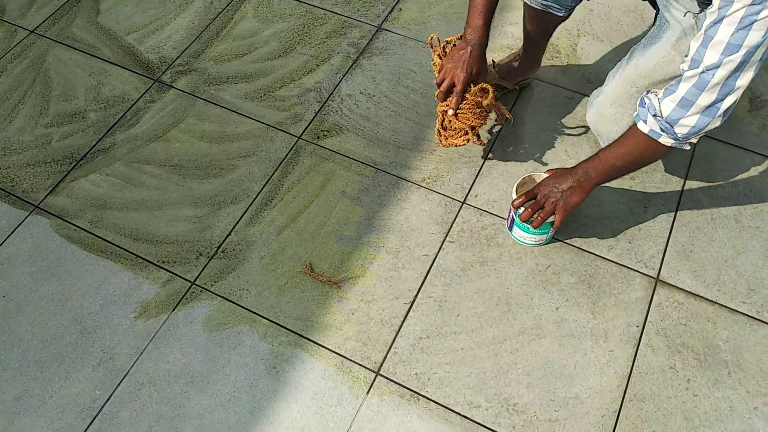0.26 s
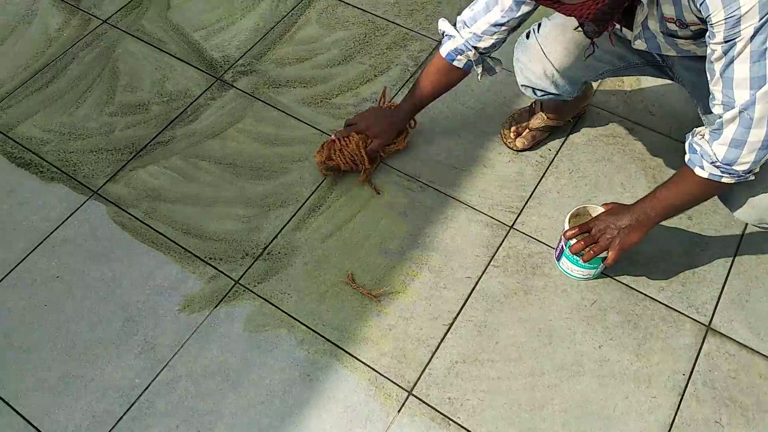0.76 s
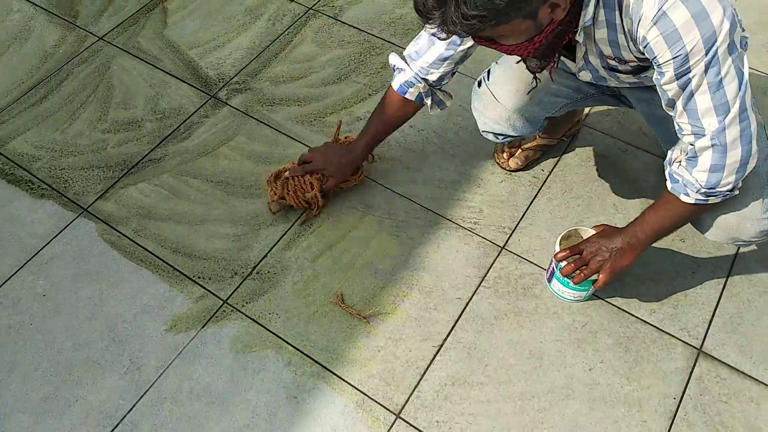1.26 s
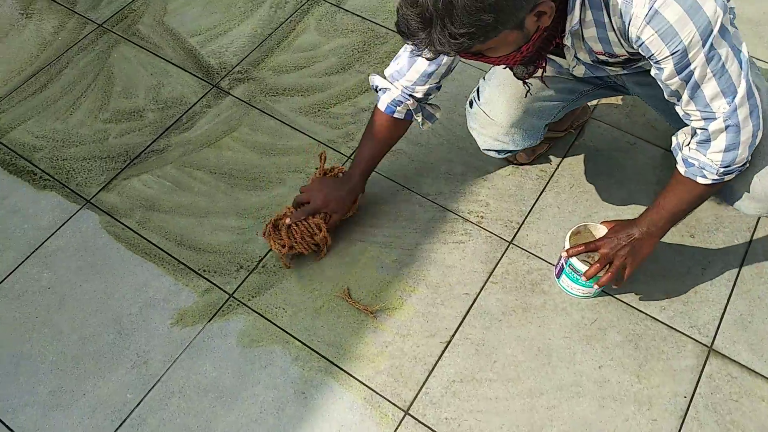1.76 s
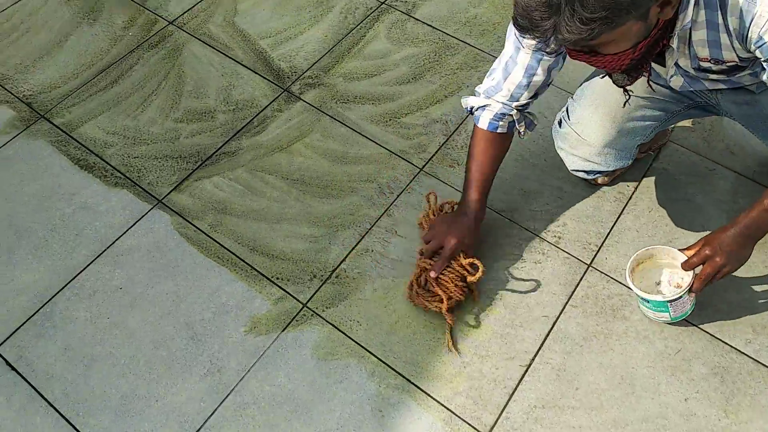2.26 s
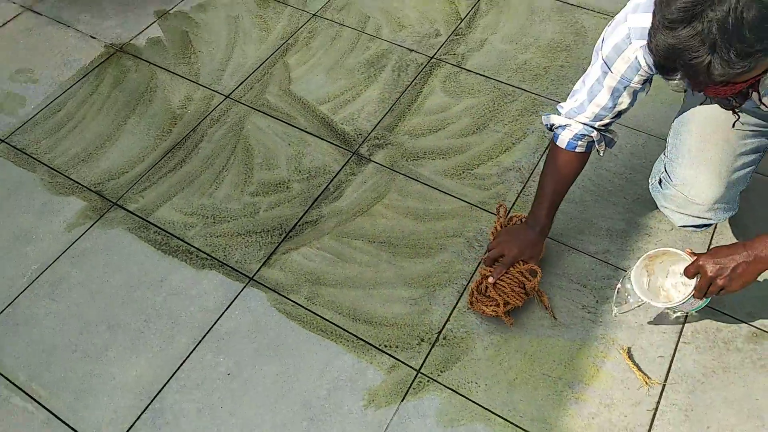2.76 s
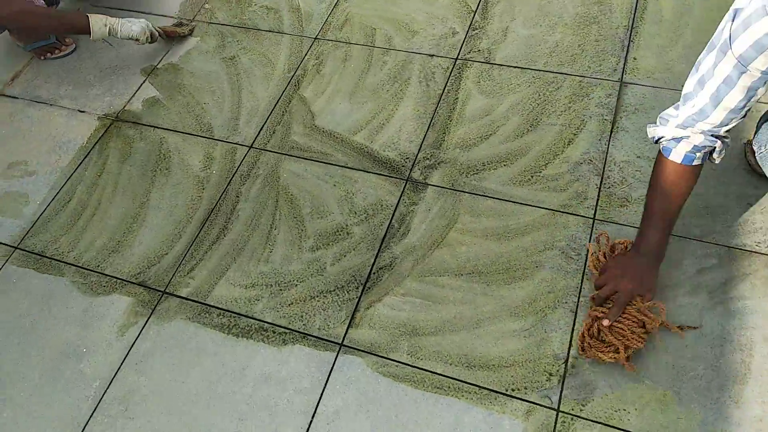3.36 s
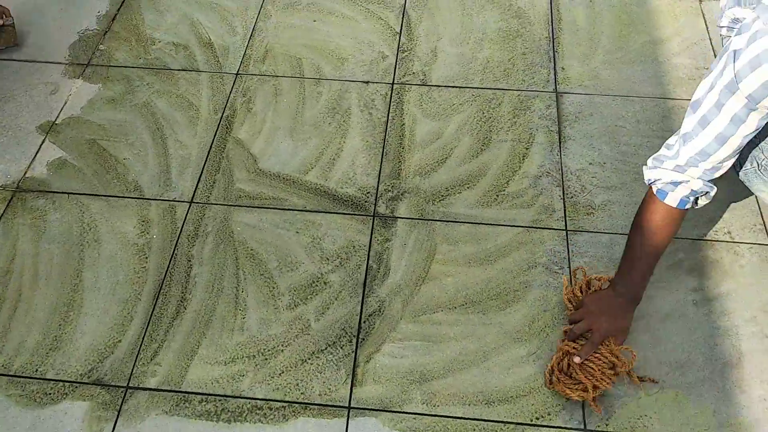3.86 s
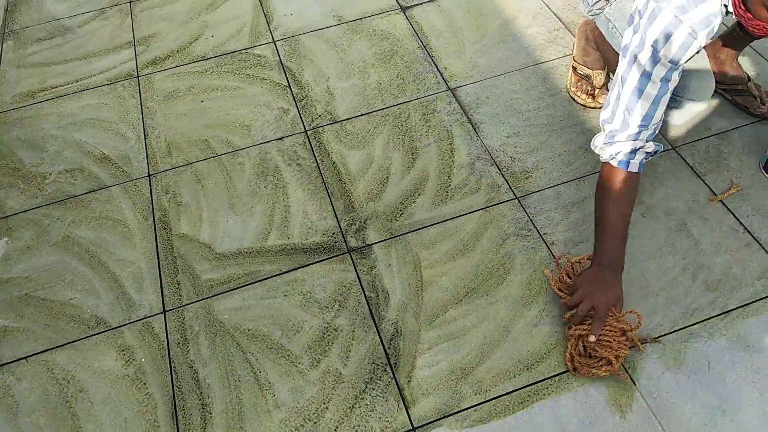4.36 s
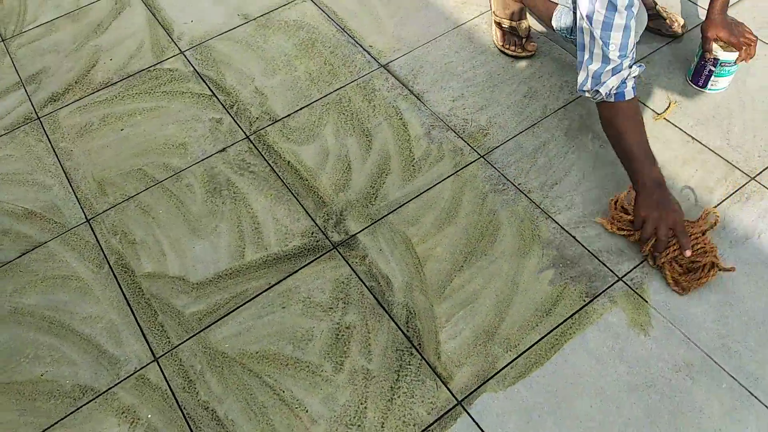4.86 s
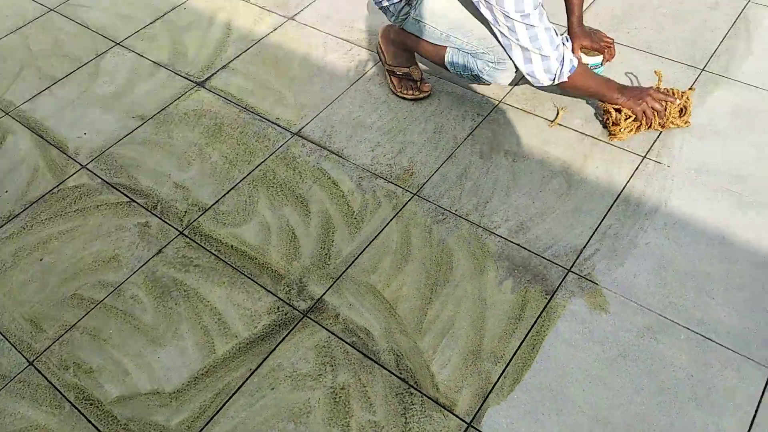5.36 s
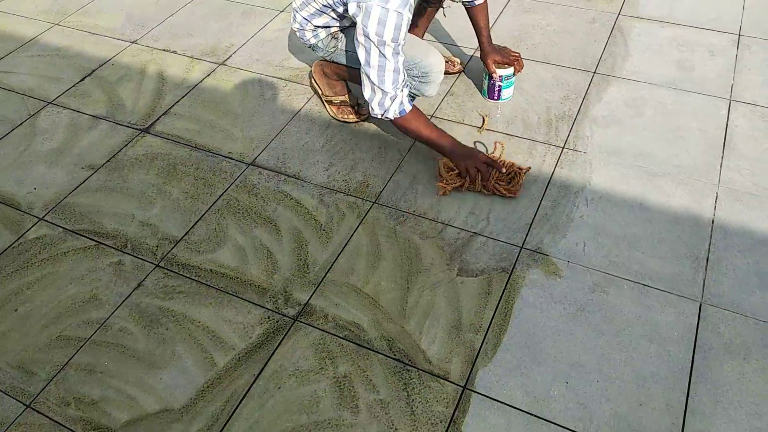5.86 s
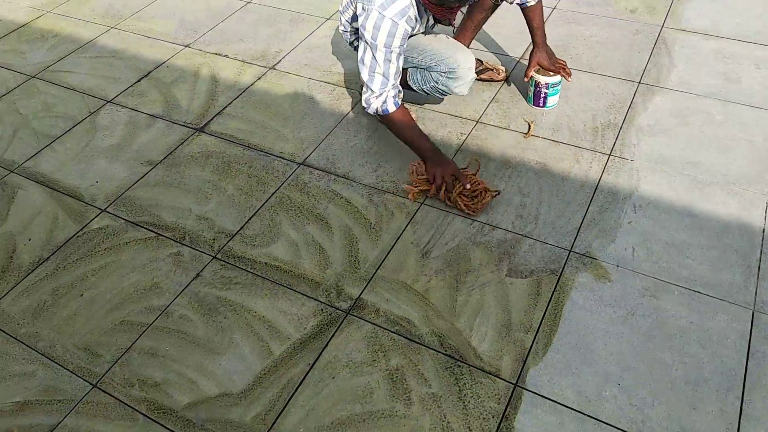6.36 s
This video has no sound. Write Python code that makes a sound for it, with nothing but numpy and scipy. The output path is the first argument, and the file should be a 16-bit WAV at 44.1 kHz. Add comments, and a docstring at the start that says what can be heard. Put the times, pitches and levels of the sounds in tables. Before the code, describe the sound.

Quick, hissing scrubbing strokes of rope fibre on a wet, gritty tile floor outdoors, with low wind buffets and faint scuffs.

```python
"""A bundle of rope fibre scrubs to and fro over wet floor tiles, outdoors, about four strokes a second.
Countless fibres catch and slip on the glaze: a bright hiss that dips at each turn of the hand,
over a lower rasp of grit. Sandals and a small tub scuff the floor now and then.
The hand-held stereo microphone follows the work; gusts buffet its two ports, with faint air far off."""
import sys
import numpy as np
from scipy import signal
from scipy.fft import rfft, irfft
from scipy.io import wavfile
from scipy.ndimage import uniform_filter1d, map_coordinates

SR = 44100
rng = np.random.default_rng(int(sys.argv[2]) if len(sys.argv) > 2 else 0)


def master_out(mix):
    """Clip the mix to full scale and print it as 16-bit PCM to the path in sys.argv[1]."""
    frames = np.transpose(np.atleast_2d(mix))
    ceiling = np.clip(frames, -1, 1)
    pcm = np.round(ceiling * 32767).astype(np.int16)
    wavfile.write(sys.argv[1], SR, pcm)


N = 290697
TIME = np.arange(N) / SR
FREQS = np.maximum(np.arange(N // 2 + 1) * SR / N, 1)
TOP_HZ = 15800  # highest frequency heard


def undb(db):
    """Decibels to gain."""
    return 10 ** (np.asarray(db) / 20)


def unit(x):
    """Scale to an rms of one."""
    return x / np.sqrt(np.mean(x ** 2, axis=-1, keepdims=True))


def curve(rows, column=1):
    """One column of a table, joined by straight lines in time."""
    rows = np.array(rows, float)
    return np.interp(TIME, rows[:, 0], rows[:, column])


def spectrum(rows, column=1):
    """Gain at each frequency from a table of freq_hz and level_db."""
    rows = np.array(rows, float)
    return undb(np.interp(np.log(FREQS), np.log(rows[:, 0]), rows[:, column]))


def shaped(x, gain):
    """Filter by a gain for each frequency."""
    return irfft(rfft(x) * gain, N)


def resonance(hz, width_hz):
    """Response of one damped resonance."""
    return 1 / (1 + 1j * (FREQS ** 2 - hz ** 2) / (FREQS * width_hz))


def walk(per_s):
    """Smooth random drift with an rms of one, changing about per_s times a second."""
    steps = rng.standard_normal(8192)
    joined = np.interp(TIME * per_s, np.arange(len(steps)), steps)
    return unit(uniform_filter1d(joined, int(SR / per_s / 2) + 1))


def slips(per_s, spread_db):
    """Tiny clicks at random moments, their sizes scattered by spread_db."""
    hit = rng.random(N) < per_s / SR
    polarity = rng.choice([-1, 1], N)
    return unit(hit * polarity * undb(spread_db * np.clip(rng.standard_normal(N), -3, 3)))


# Strokes across the tiles, each lasting until the next: start_s, sweep_db, opening_turn_re_sweep_db
STROKES = [(0.0, -60, 19.5), (0.084, -60, 11), (0.337, -56.5, 5), (0.55, -38, -4), (0.874, -37.5, -13),
           (1.095, -34.5, -10), (1.346, -38.5, -6), (1.566, -37.5, -4.5), (1.808, -38, -13.5),
           (2.05, -38.5, -4), (2.255, -39.5, -12.5), (2.475, -45.5, -5), (2.816, -61, 3),
           (3.043, -37.5, -32.5), (3.302, -35, -19), (3.543, -34, -14.5), (3.754, -37.5, -20),
           (4.005, -36, -8), (4.248, -35.5, -21), (4.525, -35.5, -20.5), (4.825, -37, -12),
           (5.094, -34, -13), (5.437, -39, -8.5), (5.795, -44.5, 8), (6.056, -40, 0), (6.334, -41, -1)]
# State of the floor and the grip: time_s, rasp_re_hiss_db, coarse_re_fine_db
GRIP = [(0, -24, -4), (0.47, -22, -5), (0.7, -28, 2), (1.0, -24, 1), (1.6, -28, 0), (2.4, -20, -1),
        (2.75, -15, -0.5), (3.4, -21, 1), (4.6, -14.5, 0), (5.3, -13, -1), (5.55, -17, -0.5),
        (6.59, -9, 1.5)]
# Early strokes swell to mid-sweep, later ones press more evenly: time_s, swell_db
SWELL = [(2.4, 8.5), (3.2, 2.5)]


def hand():
    """Gains of hiss, rasp and coarse strands as the hand speeds up, sweeps and slows into a turn."""
    rise_s, fall_share, speed_power = 0.08, 0.3, 1.8
    pile_up_db = 14.5  # grit gathers ahead of the bundle along a stroke
    start, sweep_db, turn_db = np.transpose(STROKES)
    stroke, along = stroke_progress()
    rise = np.clip((TIME - start[stroke]) / rise_s, 0, 1)
    fall = np.clip((1 - along) / fall_share, 0, 1)
    speed = np.sin(rise * np.pi / 2) * np.sin(fall * np.pi / 2)
    swell_db = curve(SWELL) * (np.sin(np.pi * along) - np.pi / 4)
    sweep = undb(sweep_db[stroke] + swell_db) * speed ** speed_power
    drag = np.interp(TIME, start, undb(sweep_db + turn_db))  # some strands still rub in the turn
    rasp_db = curve(GRIP) + pile_up_db * (along - .5)
    return drag + sweep, drag * undb(-15) + sweep * undb(rasp_db), undb(curve(GRIP, column=2) / 2)


def stroke_progress():
    """Number of the stroke under way, and how far along it the hand is, 0-1."""
    start = np.array(STROKES)[:, 0]
    stroke = np.maximum(np.searchsorted(start, TIME, "right") - 1, 0)
    return stroke, (TIME - start[stroke]) / np.diff(start, append=N / SR)[stroke]


# Colour of the hiss in front of the microphone, and off to one side: freq_hz, left_db, right_db
HISS_ON_AXIS = [(300, -34.0, -34.0), (1000, -27.0, -27.0), (2000, -25, -21), (2800, -14.5, -20),
                (3400, -8.7, -8.5), (4300, -0.5, 0.7), (5300, -15, -3.5), (6200, -6.8, 2.6),
                (7500, -6.8, -8.5), (9300, 2.4, 3.4), (10300, -1.2, -3.4), (11400, -8.8, -14.5),
                (13000, -12.6, -12.6), (15500, -12, -10.5)]
HISS_OFF_AXIS = [(300, -34.0, -34.0), (1000, -27.0, -27.0), (2000, -18, -14.5), (3000, -11.5, -17),
                 (3500, -5, -3.2), (4200, 0, 0), (5100, -7.5, -10.5), (6000, -11.5, -1.5), (7500, -5, 1.6),
                 (9000, -1, -1.7), (10300, 1.3, -5.6), (11500, -0.8, -8.8), (13000, -10, -12.5),
                 (15500, -11.7, -12)]


def fibre_hiss(shared_slips, snaps, coarse_gain, off_axis, port):
    """Fibres catch and slip on the glaze; the grip shifts the load from coarse strands to fine ends."""
    alike = 0.32 / (1 + (FREQS / 5000) ** 6) + 0.012  # the ports agree only on long waves
    own_slips = slips(per_s=14000, spread_db=1.5) + snaps
    fibres = shaped(shared_slips, np.sqrt(alike)) + shaped(own_slips, np.sqrt(1 - alike))
    coarse_band = 1 / (1 + (FREQS / 6500) ** 6)
    fibres = shaped(fibres, coarse_band) * coarse_gain + shaped(fibres, 1 - coarse_band) / coarse_gain
    ahead = unit(shaped(fibres, spectrum(HISS_ON_AXIS, column=port + 1)))
    aside = unit(shaped(fibres, spectrum(HISS_OFF_AXIS, column=port + 1)))
    return (1 - off_axis) * ahead + off_axis * aside


# Resonances of the pressed bundle at mid-stroke: pitch_hz, width_hz, level_db
BUNDLE_MODES = [(1510, 170, -19), (2516, 3300, 0)]


def grit_rasp(shared_grit):
    """Grit rolls under the bundle, whose resonances rise as it packs tighter along a stroke."""
    glide_octaves = 0.14  # either side of mid-stroke
    body = sum(undb(db) * np.abs(resonance(hz, width)) ** 2 for hz, width, db in BUNDLE_MODES)
    rasp = unit(shaped(shared_grit + slips(per_s=2600, spread_db=4.5), body))
    _, along = stroke_progress()
    pitch_ratio = 2 ** (glide_octaves * (2 * along - 1))
    return map_coordinates(rasp, [np.cumsum(pitch_ratio)], order=3, mode="wrap")


# The hand bears down and one group of strands bites: centre_s, half_length_s, boost_db, centre_hz
BITES = [(0.694, 0.19, 7, 4600), (0.966, 0.04, 4.5, 9700), (1.028, 0.03, 6.5, 4500),
         (1.155, 0.03, 5.5, 4560), (1.698, 0.085, 5, 7200), (5.513, 0.077, 7, 8500),
         (4.927, 0.043, 3, 11500)]


def strand_colour(rub):
    """Strands lie anew in each stroke and bite when pressed; the arm reflects their sound."""
    lie_depth_db, lie_spacing_hz = 2.2, 330
    patch_depth_db, patch_hz, patch_changes_per_s = 5, 170, 22
    comb_depth_db, arm_lag_ms, arm_swing_ms = 2.3, 0.4, 0.09
    bite_half_octaves = 0.65
    hz, times, frames = signal.stft(rub, SR, nperseg=512)
    starts = np.array(STROKES)[:, 0]
    stroke = np.maximum(np.searchsorted(starts, times) - 1, 0)
    ripples = rng.standard_normal((len(starts), 200))
    lies = np.array([np.interp(hz / lie_spacing_hz, np.arange(200), row) for row in ripples])
    lie_db = lie_depth_db * np.tanh(uniform_filter1d(lies[stroke].T, size=12, axis=1))
    # random short-lived patches flicker across the spectrum
    grid = np.meshgrid(hz / patch_hz, times * patch_changes_per_s, indexing="ij")
    patch_db = patch_depth_db * map_coordinates(rng.standard_normal((128, 256)), grid, order=1, mode="wrap")
    reach = np.cos(np.pi * np.interp(times, starts, np.arange(len(starts))))
    lag_s = (arm_lag_ms + arm_swing_ms * reach) / 1000
    comb_db = comb_depth_db * np.cos(2 * np.pi * np.outer(hz, lag_s))
    colour = undb(lie_db + patch_db + comb_db)
    colour /= np.sqrt(np.mean(colour ** 2, axis=0))
    for centre_s, half_s, db, centre_hz in BITES:
        octaves = np.log2((hz[:, None] + 1) / centre_hz)
        colour *= undb(db * np.exp(-((times - centre_s) / half_s) ** 2 - (octaves / bite_half_octaves) ** 2))
    return signal.istft(frames * colour, SR)[1][:N]


# The microphone swings round to follow the work: time_s, off_axis_share, left_lead_ms
MIC_BEARING = [(0, 0.33, 0.13), (2.4, 0.43, 0.0067), (3.2, 0.9, 0.34), (5.2, 0.95, 0.18),
               (6.3, 0.95, 0.0086)]


def scrubbing():
    """Hiss and rasp reach the two ports slightly apart, fluttering as the fibres slip in tufts."""
    hiss_gain, rasp_gain, coarse_gain = hand()
    off_axis, lead_s = curve(MIC_BEARING), curve(MIC_BEARING, column=2) / 1000
    tufts = undb(.5 * walk(70) + .8 * walk(380))
    snaps = undb(-18) * slips(per_s=130, spread_db=4)  # wet strands snap off the tile
    fibres = slips(per_s=5200, spread_db=2) + snaps
    grit = slips(per_s=1000, spread_db=0)
    ports = []
    for port in range(2):
        heard_at = TIME + lead_s * (.5 - port)
        hiss = fibre_hiss(np.interp(heard_at, TIME, fibres), snaps, coarse_gain, off_axis, port)
        rasp = grit_rasp(np.interp(heard_at, TIME, grit))
        nearness = undb(0.33 + 1.45 * (port - .5))  # the work lies a little to the right
        rub = tufts * (nearness * hiss_gain * hiss + undb(-1) * rasp_gain * rasp)
        ports.append(strand_colour(rub))
    return np.array(ports)


# Rumble of a moderate gust on the microphone: freq_hz, level_db
RUMBLE = [(20, -27), (40, -19), (70, 1.5), (120, 3.5), (200, -6), (300, -15), (450, -26), (700, -47.5),
          (1100, -60.5), (3000, -56)]


def eddies(gust_db):
    """Eddies tumble over one port; a harder gust sheds faster ones and so reaches higher."""
    level_db = gust_db + 4.6 * np.tanh(1.5 * walk(42))
    speed = 2 ** (np.clip(level_db + 26, -6, 11) / 18)
    field = shaped(rng.standard_normal(N), spectrum(RUMBLE))
    small = shaped(field, 1 / (1 + (260 / FREQS) ** 4))
    large = field - small
    flurries = undb(8 * np.tanh(walk(90)) - 1)
    pressure = map_coordinates(large + small * flurries, [np.cumsum(speed)], order=3, mode="wrap")
    steady_s = 0.17  # slower swells are evened out, leaving the level to the gust
    power = uniform_filter1d(pressure ** 2, int(steady_s * SR))
    power = uniform_filter1d(power, int(steady_s * SR / 2))
    return pressure / np.sqrt(power) * undb(level_db + 2)


# Running breeze on the left and right ports: time_s, level_db
BREEZE_LEFT = [(0.0, -53.5), (0.74, -54.5), (1.0, -28), (1.1, -35), (1.22, -56.5), (1.54, -30), (2.02, -39),
               (2.1, -17), (2.44, -18), (2.7, -30), (2.77, -24), (2.93, -26.5), (3.02, -17.5), (3.17, -19),
               (3.25, -24.5), (3.54, -36.5), (3.78, -22), (3.94, -34), (4.04, -80), (5.14, -86),
               (5.4, -63.5), (6.58, -42.5)]
BREEZE_RIGHT = [(0.0, -32), (0.468, -56), (0.567, -23), (0.689, -21), (0.951, -32), (1.21, -25),
                (1.3, -45.5), (1.602, -32), (1.838, -41), (1.981, -20), (2.979, -31), (3.059, -24),
                (3.661, -51), (3.742, -25), (4.04, -73.5), (4.861, -87), (5.018, -57), (6.378, -53.5),
                (6.581, -52)]
# Lone puffs on the microphone: start_s, length_s, level_db, port (0 left, 1 right)
PUFFS = [(0.753, 0.079, -17.5, 1), (2.379, 0.11, -12.5, 0), (3.485, 0.068, -32.5, 1), (4.19, 0.2, -43, 0),
         (4.378, 0.18, -31, 0), (4.603, 0.095, -31.5, 0), (4.928, 0.053, -41, 0), (5.311, 0.17, -43.5, 0),
         (5.775, 0.17, -37, 0), (5.965, 0.071, -30.5, 0), (6.114, 0.16, -36, 0)]


def wind():
    """Each port catches its own breeze, and lone puffs that rise, hold and drop."""
    edge_s = 0.028
    strength = undb([curve(BREEZE_LEFT), curve(BREEZE_RIGHT)])
    for start, length, db, port in PUFFS:
        edge = np.clip(np.minimum(TIME - start, start + length - TIME) / edge_s, 0, 1)
        strength[port] = np.hypot(strength[port], undb(db) * np.sin(edge * np.pi / 2) ** 2)
    return np.array([eddies(gust_db) for gust_db in 20 * np.log10(strength)])


# Outdoor air in the distance: freq_hz, level_db
DISTANT_AIR = [(200, -31), (450, 11.5), (1100, 10), (2500, 13), (6000, -40)]


def air():
    """Faint, steady outdoor background, different at each port."""
    return undb(-61) * unit(shaped(rng.standard_normal((2, N)), spectrum(DISTANT_AIR)))


# Single eddies right on the microphone: start_s, level_db, swirl_hz, port (0 left, 1 right)
BUFFETS = [(0.045, -13, 238, 1), (0.55, -5, 151, 1), (0.615, -10.5, 264, 1), (0.738, -13, 191, 1),
           (0.819, -6, 254, 1), (1.025, -21.5, 326, 1), (1.109, -14, 170, 1), (1.547, -22, 183, 0),
           (1.735, -13, 115.3, 0), (1.984, -8, 270, 1), (2.231, -1.5, 326, 0), (2.266, -6, 289, 0),
           (2.404, -5, 348, 0), (2.438, -8, 384, 0), (2.48, -4, 398, 0), (3.022, -7.5, 272, 0),
           (3.101, -6.5, 264, 0), (3.17, -7, 450, 0), (3.301, -8, 212, 0), (6.221, -8.5, 164.6, 0),
           (6.578, -27, 151.5, 0)]


def buffets():
    """A hard eddy slaps one port with a few uneven swings: a thud when large, a flap when small."""
    turns_to_peak, wobble_octaves, port_cutoff_hz = 1.02, 0.41, 1000
    out = np.zeros((2, N))
    pace = 2 ** (wobble_octaves * walk(400))
    tatter = 1 + .5 * np.tanh(walk(250))
    for (start, db, hz, port), phase in zip(BUFFETS, rng.random(len(BUFFETS))):
        span = slice(int(start * SR), int(start * SR) + SR // 10)
        turns = np.cumsum(pace[span]) * hz / SR
        age = turns / turns_to_peak
        envelope = undb(db - 4.5) * tatter[span] * age * np.exp(1 - age)
        out[port, span] += envelope * np.sin(2 * np.pi * (turns + phase))
    return shaped(out, 1 / (1 + (FREQS / port_cutoff_hz) ** 10))


def slides(rows, right_db):
    """Grit under a sliding sole or rim rings it for as long as it moves, and the wet film sizzles."""
    out = np.zeros((2, N))
    grit = np.array([slips(per_s=3900, spread_db=3) for _ in range(2)])
    sizzle_band = (FREQS < TOP_HZ) / (1 + (12000 / FREQS) ** 10)
    sizzle = undb(-54) * unit(shaped(grit, sizzle_band))
    for start, end, db, hz, width in rows:
        along = np.clip((TIME - start) / (end - start), 0, 1)
        push = np.sqrt(np.abs(np.sin(np.pi * along)))
        ring = unit(shaped(grit + grit.mean(axis=0), resonance(hz, width) ** 2))
        out += push * (sizzle + undb(db) * ring)
    return out * undb(right_db * np.array([[-.5], [.5]]))


# A sandal on the tiles, well right of the microphone: start_s, end_s, level_db, pitch_hz, width_hz
SANDAL_SLIDES = [(0.13, 0.46, -49, 7300, 4500), (0.365, 0.5, -41.5, 7100, 2380),
                 (0.418, 0.44, -40, 7360, 1400), (0.545, 0.567, -42, 3940, 1000)]


def sandal():
    """A sole is dragged forward over wet grit and planted."""
    return slides(SANDAL_SLIDES, right_db=8.5)


# Scuffs and knocks of sandals and tub, centred: start_s, level_db, pitch_hz, t60_s, width_hz
SCUFFS = [(0.172, -48, 3460, 0.21, 3000), (0.375, -49, 920, 0.13, 300), (0.462, -46, 650, 0.22, 280),
          (1.326, -43, 1190, 0.14, 2600), (4.256, -48, 630, 0.2, 168), (4.801, -55, 483, 0.33, 200)]


def scuffs():
    """Each contact briefly rings the sole or the tub: hollow when narrow, a crisp tap when wide."""
    attack_s = 0.00038
    out = np.zeros((2, N))
    friction = rng.standard_normal(N) + .5 * rng.standard_normal((2, N))
    for start, db, hz, t60, width in SCUFFS:
        span = slice(int(start * SR), int(start * SR) + SR // 3)
        age = TIME[span] - TIME[span][0]
        envelope = (1 - np.exp(-age / attack_s)) * undb(-60 * age / t60)
        ring = unit(shaped(friction, resonance(hz, width) ** 2))
        out[:, span] += undb(db) * envelope * ring[:, span]
    return out


# The tub on the tiles, a little right of the microphone: start_s, end_s, level_db, pitch_hz, width_hz
TUB_SLIDES = [(0.44, 0.51, -52, 1800, 900), (0.98, 1.07, -51, 2150, 800), (2.515, 2.79, -49.5, 1750, 1000),
              (5.71, 5.94, -50, 1950, 1500)]


def tub():
    """The small tub is pushed along, its rim scraping over grit."""
    return slides(TUB_SLIDES, right_db=3)


def scene():
    """Work on a wet floor in the open air, with wind on the microphone."""
    return scrubbing() + wind() + air() + buffets() + sandal() + scuffs() + tub()


def record(dry):
    """The microphone rounds off the hardest gusts; the sound is then low-passed at 15.8 kHz."""
    ceiling = .55
    lowpass = signal.ellip(10, .05, 60, TOP_HZ, fs=SR, output="sos")
    return signal.sosfiltfilt(lowpass, ceiling * np.tanh(dry / ceiling))


dry = scene()
out = record(dry)
master_out(out)
```